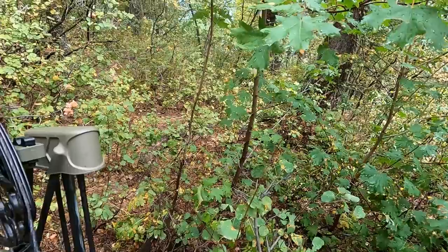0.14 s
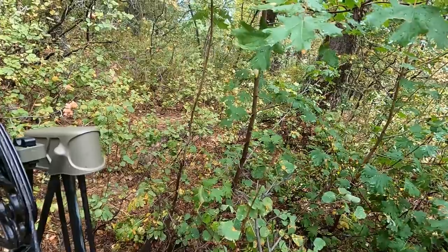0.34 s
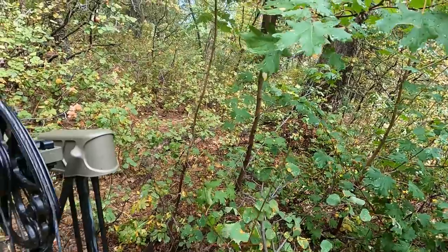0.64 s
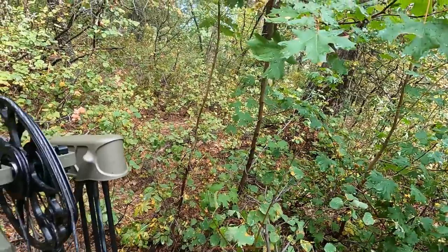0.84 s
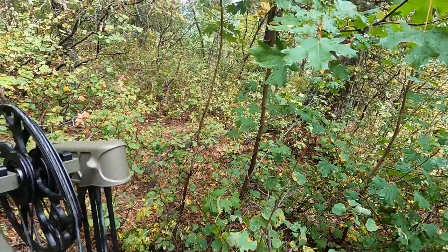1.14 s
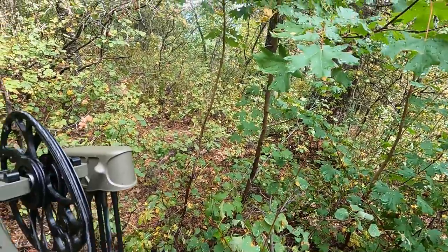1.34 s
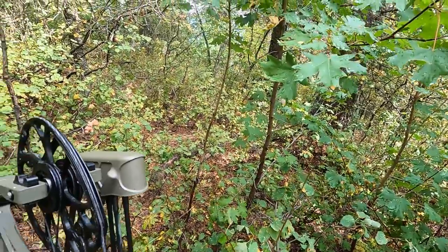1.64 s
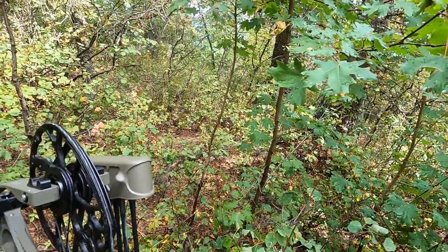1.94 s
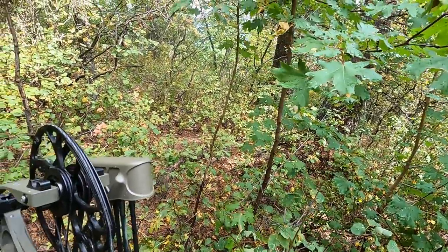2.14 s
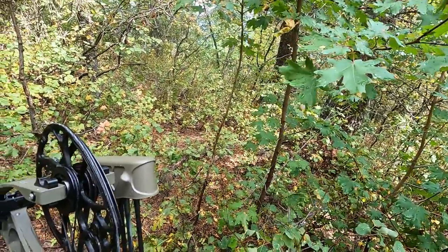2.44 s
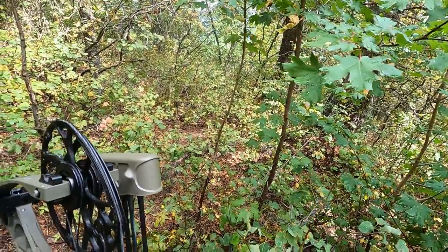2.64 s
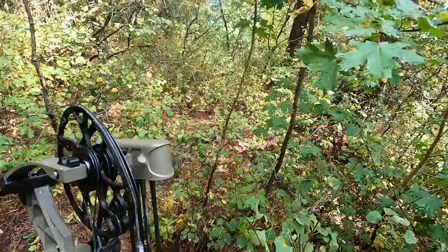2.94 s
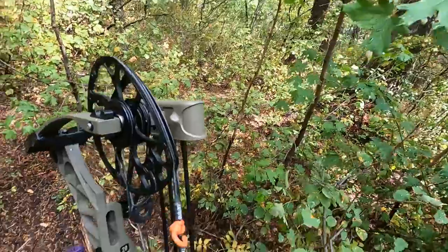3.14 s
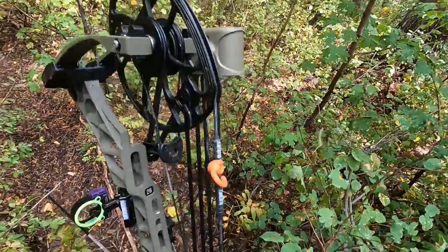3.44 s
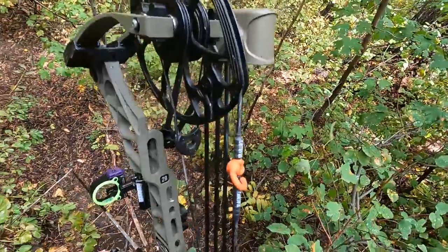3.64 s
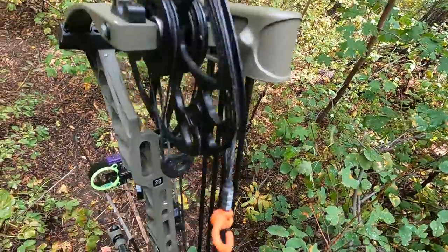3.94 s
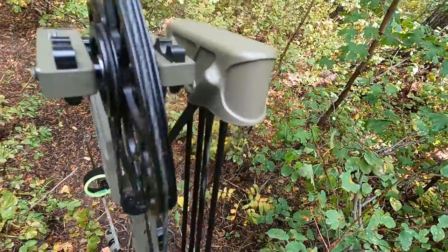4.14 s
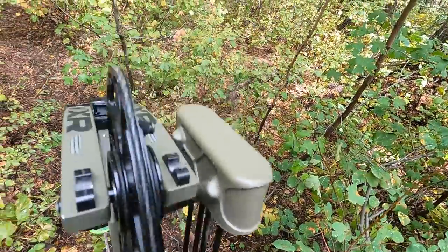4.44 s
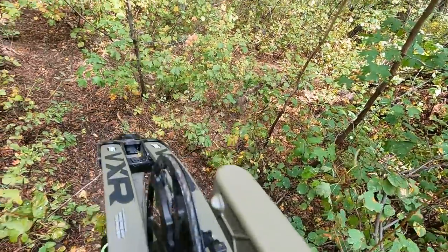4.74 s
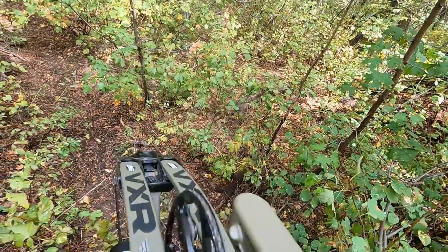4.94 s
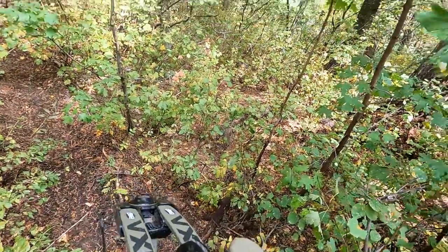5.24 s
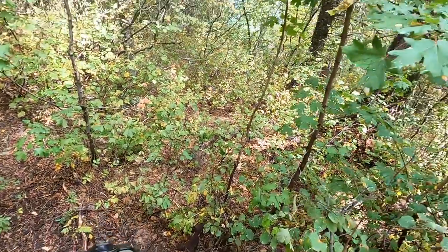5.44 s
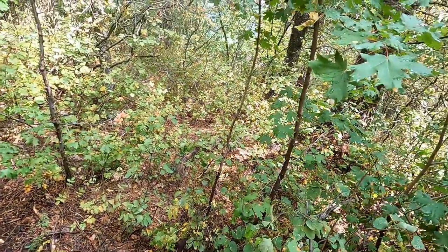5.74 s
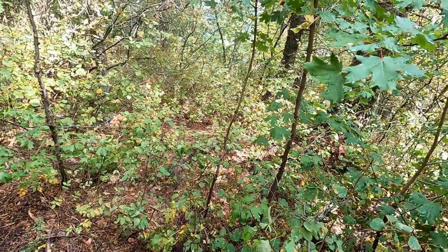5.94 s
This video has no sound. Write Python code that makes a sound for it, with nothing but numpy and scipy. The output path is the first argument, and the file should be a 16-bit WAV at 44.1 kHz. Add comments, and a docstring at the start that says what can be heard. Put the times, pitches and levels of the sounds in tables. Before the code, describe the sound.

In a quiet wood a bull elk gives hoarse, echoing grunts off to the left, while cloth scrapes and thumps close to the microphone.

```python
"""A quiet wood, heard in stereo from a camera: lumpy low rumble, wind on the microphone ports, soft leaf hiss.
A bull elk off to the left is already in the first of three hoarse grunts: flapping folds swell a cry and
puff air through the throat, and sparse taps off the trees carry it on. Within the first second cloth drags
close over the housing (shaped noise) and ends in knocks (ringing modes and a slow bounce). Twigs tick, leaves
rustle in grainy noise and faint fuzzy lines whistle or scrape; two more grunts follow after three seconds."""
import sys
import numpy as np
from scipy import signal
from scipy.fft import rfft, irfft
from scipy.io import wavfile
from scipy.ndimage import uniform_filter1d

SR = 44100
rng = np.random.default_rng(int(sys.argv[2]) if len(sys.argv) > 2 else 0)


def dump(signal):
    """Clip the signal to [-1, 1] and save it as 16-bit WAV at the path in sys.argv[1]."""
    limited = np.clip(np.atleast_2d(signal).T, -1, 1)
    pcm = np.round(limited * 32767).astype(np.int16)
    wavfile.write(sys.argv[1], SR, pcm)


N = 269010  # samples

# Spectra are joined on a log axis; shape_db columns are dB per Hz, side_db columns are left minus right.
# rumble of the place: start_s, level_db; and its spectrum: freq_hz, shape_db
RUMBLE_LEVEL = [(0, -46.5), (.4, -44.5), (.85, -51.5), (1.3, -49.5), (1.65, -48.5), (2.4, -42),
                (2.95, -45.5), (3.3, -43), (3.85, -46), (4.85, -47.5), (5.3, -44.5), (6.1, -49)]
RUMBLE_SHAPE = [(62, -64), (105, -40), (113, -47.5), (133, -14.5), (162, 10.5), (189, 1.5), (231, -8.5),
                (285, -6.5), (354, -19), (500, -33.5), (650, -35.5), (1100, -120)]
# wind on the microphone ports: start_s, level_db; freq_hz, shape_db
WIND_LEVEL = [(0.9, -73), (1.28, -63.5), (1.68, -71.5), (3.12, -66.5), (4.88, -75.5), (5.58, -66),
              (5.75, -71), (6.1, -68)]
WIND_SHAPE = [(10, -23.5), (30, 13.5), (60, 4), (100, 6), (140, -48.5)]
# far leaf hiss: start_s, swell_db (weighted by AIR_SWELL about -60 dB); freq_hz, shape_db
AIR_LEVEL = [(1.3, -67.5), (1.6, -72.5), (1.95, -65.5), (2.35, -66.5), (2.8, -69.5), (3.2, -68)]
AIR_SHAPE = [(210, -28), (350, -1.5), (408, -5.5), (507, -9.5), (649, -11.5), (793, -13), (1020, -5),
             (1360, -4), (1490, -5), (2030, -16.5), (2860, -24.5), (5460, -20.5), (8280, -30.5),
             (11800, -40.5), (14000, -57.5)]
AIR_SWELL = [(600, 0.27), (1300, 1.0), (2500, 0.38)]  # freq_hz, share of the swell that is heard
# stereo field: freq_hz, likeness of the ears (0-1); freq_hz, side_db;
# freq_hz, phase_rad by which the left ear leads the right
SAME = [(60, 0.92), (130, 0.44), (290, 1), (640, 0.44), (1410, 0.51), (3100, 0.2), (6810, 1), (15000, 0.16)]
LEAN = [(60, -0.5), (180, -2.5), (550, -3.5), (1650, -0.5), (4970, 1), (15000, 3)]
LEAD = [(0, 0.76), (2760, 0.58), (4220, -1.6), (5510, 0.58), (12700, 1), (15200, -0.3)]
# the drag jolts the microphone ports
JOLT_S, JOLT_RISE_DB_PER_S, JOLT_FALL_DB_PER_S = 0.502, 296, 148
JOLT_WIND_DB, JOLT_RUMBLE_DB = -28.5, -29.5

# one row a grunt: first_flap_s, length_s, effort_db, top_pitch_hz, settled_flaps_per_s, settle_s,
# fullest_breath_db (against effort), opening_pitch_hz, held_until_s, closing_pitch_hz, upper_throat_db, rasp_hz
GRUNTS = [(-.0735, 0.27, -25.5, 1216, 42.3, 0.086, -18.5, 1071, 0.089, 1111, 0.5, 3800),
          (3.285, .275, -26, 1203, 43.5, .12, -4, 1088, 0.17, 1078, 2.5, 4060),
          (4.468, 0.28, -25, 1289, 44.5, .145, -6.5, 964.5, .11, 1091, 0.5, 4280)]
# upper throat and nose: freq_hz (at a cry pitch of 1200 Hz), width_hz, relative_db, lag_flaps
THROAT = [(1040, 90, -16, .6), (1520, 80, -13, .6), (1690, 80, -15, .4), (1900, 80, -21, .3),
          (2050, 100, -25, .3), (2560, 160, -28, .2)]
# breath noise: freq_hz, shape_db
BREATH_SHAPE = [(1290, -35), (2100, -2), (2350, -14), (2560, -3.5), (2950, -2.5), (3230, -9), (3600, -2.5),
                (4050, -4.5), (4600, -5), (5230, -9), (5800, -14), (9000, -41.5), (11700, -72),
                (19800, -120)]
# elk heard from the left: freq_hz, side_db
ELK_SIDE = [(300, 1), (600, 7), (900, 11), (1250, 16), (1700, 9), (2400, 5), (4400, 6), (9000, 3)]
# decay of the wood's echo: freq_hz, t60_s; and its colour: freq_hz, level_db
WOODS_T60 = [(500, .7), (950, 1.), (1230, 1.75), (1550, 1.4), (1900, 1.05), (2400, .8), (4000, .65),
             (8000, .4)]
WOODS_COLOUR = [(600, 0), (1000, -2), (1230, -1), (1500, -3.5), (2000, -3), (4000, 1)]
TRUNKS_T60 = [(500, 0.3), (5000, 0.15)]  # near trunks: freq_hz, t60_s
TRUNKS_DB, WOODS_DB = -14, -19.5
CLUMP_S = .012  # trunks stand in clumps, so the echo flutters
FIRST_FLAPS_PER_S, SETTLE_BEND = 80, 1.6
SWELL_RISE, SWELL_HOLD, SWELL_FALL = .34, .44, .36  # shares of one flap
# the attack takes a share of the settling time
ATTACK_SHARE, ATTACK_DB, SAG_DB, RELEASE_S, RELEASE_DB, FADE_S = 0.62, -24.5, -2.5, 0.093, -13.5, 0.068
TOP_S, CLOSE_S = .1, 0.19  # the cry pitch reaches its top, and has sunk to its close
LOWEST_HZ, LOWEST_FOLLOWS = 557, 1.53  # lowest throat resonance at a 1200 Hz cry; how steeply it follows the pitch
RASP_WIDTH_HZ, RASP_DB = 1200, -9  # the breath rings in one wide high pocket of the throat
HISS_DB, HISS_FROM_S, HISS_DB_PER_S = -24, 0.076, 107  # breath against effort
BREATH_DIES_S, BREATH_GONE_S = 0.049, 0.012  # before the end
SLAP_FIRST, SLAP_LATER, SLAP_S = .9, .1, .08  # share of bare fold slaps
ROUGH_HELD, ROUGH_FROM_S, ROUGH_END, ROUGH_BEFORE_END_S = .15, .16, .95, .05
PUFF_HELD = .65  # share of air in what rings the throat while the cry is held

# twig and leaf ticks: start_s, peak_db, centre_hz, side_db, woody_body_db (against the peak)
TICKS = [(0.145, -40, 5600, 3, -7.5), (0.337, -56, 4000, 2, 8), (0.356, -55, 6000, -11, 6),
         (0.6047, -47, 7560, 5, 11), (0.84, -59, 3974, -14, -8.5), (2.5239, -63, 4930, 3, 23),
         (2.5391, -46.5, 4360, -3.5, 15), (2.5487, -54.5, 5000, 3, 20.5), (2.57, -45.5, 4000, -4, 9),
         (2.584, -59, 5300, 3, 18), (3.5297, -56, 4370, 5, 12), (3.827, -52.5, 4530, 5, -7),
         (4.3396, -47, 4470, 2, -28), (4.433, -52.5, 4700, 3, -9), (4.562, -48.5, 6100, 7, 5),
         (4.781, -62.5, 7700, 31, -22), (4.8922, -44, 7360, 6, -10), (5.0927, -44, 1980, -4, -10),
         (5.5456, -50, 5000, -1.7, -22)]
TICK_WIDTH = 0.47  # against the centre
# faint fuzzy lines: start_s, end_s, start_hz, end_hz, width_hz, level_db (before the fades)
WHISTLES = [(.15, .36, 7750, 7600, 260, -74), (.6, .93, 4800, 4800, 3, -81),
            (1.1, 1.85, 5320, 5320, 3, -82), (2.37, 2.46, 7500, 7600, 250, -78),
            (3.578, 3.783, 7800, 7600, 250, -78), (4.925, 5.065, 7400, 7800, 300, -73),
            (5.104, 5.142, 2380, 2400, 550, -58), (5.15, 5.177, 1810, 1780, 200, -60),
            (5.11, 5.185, 9140, 9600, 400, -77), (5.193, 5.252, 2630, 2390, 260, -57),
            (5.187, 5.24, 4500, 4500, 500, -63.5), (5.32, 5.435, 2560, 2460, 220, -67),
            (5.658, 5.74, 5840, 5800, 2300, -64)]
# knocks on the housing: start_s, rap_db, bounce_db, side_db
KNOCKS = [(0.219, -65, -38, 2), (0.358, -61, -29.5, -7), (0.481, -30, -8, -4), (.497, -16, -9.5, -5),
          (0.512, -30, -22, -8), (0.569, -35, -22, -5), (.592, -15, -0.5, -7.5)]
# ringing modes of the housing: freq_hz, relative_db, t60_s
HOUSING = [(174, 10, 0.03), (254, 8.5, 0.027), (525, 1.5, 0.022), (925, 4.5, 0.0099), (1380, -6, 0.013)]
BOUNCE_HZ, BOUNCE_T60_S = 31.5, 0.11  # the camera rocking on its mount, once its pitch has sunk
# leaf stirs: peak_s, peak_db, rise_s, fall_s; spectrum of the leaves: freq_hz, shape_db
RUSTLE = [(.272, -64, 0.0078, .04), (2.546, -67.5, 0.047, 0.056), (5.01, -71.5, 0.06, 0.12),
          (5.14, -62, 0.03, 0.11), (5.215, -63.5, 0.031, 0.031), (5.37, -72, 0.15, 0.11),
          (5.562, -68, 0.064, 0.052), (5.696, -71, 0.088, 0.07), (5.85, -75.5, 0.087, 0.11)]
LEAVES_SHAPE = [(880, -46), (1500, -4), (2530, -0.5), (3180, -7), (3360, -10), (3990, -9), (5610, -3),
                (7750, -9.5), (11900, -16.5), (14500, -38)]
SMALL_TICKS_PER_S, SMALL_TICK_DB = 140, 0.5  # crisp grains within the rustle, against its hiss
# cloth drag: start_s, hiss_db (before the changes of tone), handling_rumble_db
DRAG = [(0.33, -45, -54), (0.386, -42.5, -40.5), (0.43, -40.5, -41.5), (0.47, -38.5, -31.5),
        (.52, -37.5, -37), (0.58, -29, -51), (0.6, -25, -11)]
# cloth still slack, then pulled tight at the end of the drag: freq_hz, shape_db
SLACK_CLOTH = [(290, -15), (500, -6), (769, -46), (996, 5), (1090, -3.5), (1490, 3), (1870, -6.5),
               (3140, -4.5), (5650, -3), (6720, -7.5), (7430, -3.5), (8950, -18.5), (13600, -26),
               (14600, -46), (15400, -84)]
TIGHT_CLOTH = [(290, -28), (500, -0.5), (647, -26), (1020, -5.5), (1330, -23), (1470, 2), (1580, -5),
               (1850, -7), (1980, -8), (2420, -11), (2680, -15), (3500, -4.5), (4180, -1.5), (4750, -7),
               (5570, -19.5), (7220, -5), (10500, -22.5), (11900, -18.5), (15400, -37)]
# place of the cloth across the microphones: freq_hz, side_db
CLOTH_SIDE = [(60, -5), (110, -2), (200, -14), (380, -25), (700, -7), (1290, -1), (2380, 0.5), (4400, -3.5),
              (8120, 11), (15000, 4)]
# handling rumble: freq_hz, shape_db; freq_hz, side_db
SHAKE_SHAPE = [(15, -24), (40, -27.0), (120, 8.5), (300, -4.0), (700, -30), (4000, -63), (12000, -110)]
SHAKE_SIDE = [(30, -6), (300, -4)]
DRAG_STOP_S = .592
TIGHT_FROM_S, TIGHT_S, TIGHT_DB = 0.496, 0.543, -1
EDGE_HZ = 15600  # upper band limit


def amp(db):
    """Amplitude factor for a level in dB."""
    return 10 ** (np.asarray(db) / 20)


def evened(x):
    """Scales a signal to rms 1."""
    return x / np.sqrt(np.mean(abs(x) ** 2) + 1e-20)


def read(points, hz):
    """A spectrum table, joined on a log axis."""
    f, value = np.transpose(points)
    return np.interp(np.log(hz + 1), np.log(f + 1), value)


def curve(rows, t):
    """All columns of a curve table at times t."""
    s, *columns = np.transpose(rows)
    return [np.interp(t, s, c) for c in columns]


def ramp(t, start, end):
    """Climbs straight from 0 to 1 between two times."""
    return np.clip((t - start) / (end - start), 0, 1)


def add(mix, s, sound):
    """Lays a sound into the mix from s seconds on."""
    part = mix[..., round(s * SR):][..., :sound.shape[-1]]
    part += sound[..., :part.shape[-1]]


def pan(db):
    """Left and right gains for a level difference."""
    return amp(np.array([db / 2, -db / 2]))


def resonate(x, hz, width):
    """Shifts the curve hz down to zero, smooths twice, shifts back: a steep resonance."""
    turn = np.exp(2j * np.pi * np.cumsum(hz * np.ones(len(x))) / SR)
    r = np.exp(-np.pi * width / SR)
    smooth = signal.lfilter([(1 - r) ** 2], [1, -2 * r, r * r], x / turn + 1e-18)
    return 2 * (turn * smooth).real


def noise(level_db, same, lean, size, patchy_db, band=(0, SR), lead=((0, 0), (1, 0))):
    """Stereo noise; level_db(hz, t) gives shape and swell, and a steady shape has rms 1 in the band."""
    hz = np.fft.rfftfreq(size, 1 / SR)[:, None]
    t = np.arange(4 * N // size + 5) * size / 4 / SR
    a, b, c, d, patches = rng.standard_normal((len(t), len(hz), 5)).T
    patches = uniform_filter1d(patches, size=size // 64, axis=0)
    patches = evened(uniform_filter1d(patches, size=12000 // size, axis=1))
    same, left = np.clip(same, 0, 1), a + 1j * b
    right = same * left + np.sqrt(1 - same ** 2) * (c + 1j * d)
    z = np.array([left * np.exp(1j * read(lead, hz)), right])
    shape_db, swell_db = level_db(hz, t)
    inside = (hz >= band[0]) & (hz < band[1])
    gain = amp(shape_db + swell_db + patchy_db * patches) / np.linalg.norm(amp(shape_db)[inside])
    z *= pan(read(lean, hz)) * gain
    return signal.istft(z, nperseg=size, noverlap=3 * size // 4)[1][:, :N]


def background():
    """Three shaped noises: patchy low rumble, deep wind on the microphone ports, hiss of far leaves."""
    def jolt_db(s):
        return np.minimum(JOLT_RISE_DB_PER_S * (s - JOLT_S), JOLT_FALL_DB_PER_S * (JOLT_S - s))

    def rumble_db(hz, s):
        return read(RUMBLE_SHAPE, hz), np.maximum(curve(RUMBLE_LEVEL, s)[0], JOLT_RUMBLE_DB + jolt_db(s))

    def wind_db(hz, s):
        return read(WIND_SHAPE, hz), np.maximum(curve(WIND_LEVEL, s)[0], JOLT_WIND_DB + jolt_db(s))

    def air_db(hz, s):
        return read(AIR_SHAPE, hz), (curve(AIR_LEVEL, s)[0] + 60) * read(AIR_SWELL, hz) - 56

    same = read(SAME, np.fft.rfftfreq(1024, 1 / SR)[:, None])
    rumble = noise(rumble_db, 0.64, LEAN, size=2048, patchy_db=2.0, band=(110, 330))
    wind = noise(wind_db, 0.9, LEAN, size=4096, patchy_db=3.5)
    air = noise(air_db, same, LEAN, size=1024, patchy_db=1.8, band=(900, 1900), lead=LEAD)
    return rumble + wind + air


def flap_swell(turns, lag, floor):
    """In each turn of the folds the sound opens, holds and dies above a steady floor."""
    part = (turns - lag + .33) % 1
    rise = lambda x: np.sin(np.pi / 2 * np.clip(x, 0, 1)) ** 2
    return evened(floor + rise(part / SWELL_RISE) * rise(1 - (part - SWELL_HOLD) / SWELL_FALL))


def upper_throat(turns, puffs, stretch, airy, throat_db):
    """Upper throat and nose resonances, rung by puffs of air and by one push a flap."""
    total = 0
    for puff, (f, width, db, lag) in zip(puffs, THROAT):
        push = np.diff(np.floor(turns - lag + .2), prepend=-1).clip(0)
        aired = flap_swell(turns, lag, .7) * evened(resonate(puff, f * stretch, width))
        pushed = evened(resonate(push, f * stretch, width))
        total = total + amp(db + throat_db) * (airy * aired + np.sqrt(1 - airy ** 2) * pushed)
    return total


def throat_breath(turns, air, rasp_hz):
    """Turbulent breath, gusting with the flaps, plus its ringing in a wide high pocket."""
    gust = flap_swell(turns, .8, 1.8)
    shape = amp(read(BREATH_SHAPE, np.fft.rfftfreq(len(air), 1 / SR)))
    breath = evened(gust * irfft(rfft(air) * shape, len(air)))
    return breath + amp(RASP_DB) * gust * evened(resonate(air, rasp_hz, RASP_WIDTH_HZ))


def grunt(length, effort_db, top_hz, settled, settle_s, fullest_db, open_hz, held_s, close_hz, throat_db, rasp_hz):
    """A cry near 1.2 kHz swells once in each slow fold flap; puffs of air ring the throat in between."""
    t = np.arange(0, length, 1 / SR)
    attack_s = ATTACK_SHARE * settle_s
    level_db = (effort_db + ATTACK_DB * (1 - ramp(t, 0, attack_s)) ** 2.28
                + SAG_DB * ramp(t, attack_s, length - RELEASE_S) ** 2
                + RELEASE_DB * ramp(t, length - RELEASE_S, length))
    rate = settled + (FIRST_FLAPS_PER_S - settled) * (1 - ramp(t, 0, settle_s)) ** SETTLE_BEND
    turns = np.cumsum(rate) / SR
    hz = (top_hz - (top_hz - open_hz) * (1 - ramp(t, 0, TOP_S)) ** 2
          - (top_hz - close_hz) * ramp(t, held_s, CLOSE_S) ** 1.373)
    low_hz = LOWEST_HZ * (hz / 1200) ** LOWEST_FOLLOWS
    hiss_db = np.minimum(HISS_DB + HISS_DB_PER_S * np.maximum(t - HISS_FROM_S, 0), fullest_db)
    slap = SLAP_LATER + (SLAP_FIRST - SLAP_LATER) * np.cos(np.pi / 2 * ramp(t, 0, SLAP_S)) ** 2
    roughening = np.sin(np.pi / 2 * ramp(t, ROUGH_FROM_S, length - ROUGH_BEFORE_END_S))
    rough = ROUGH_HELD + (ROUGH_END - ROUGH_HELD) * roughening
    wander_air, rasp_air, low_air, breath_air, *puffs = rng.standard_normal((len(THROAT) + 4, SR))[:, :len(t)]

    sag = 1 - .022 * np.sin(2 * np.pi * (turns - .2))  # the pitch slides down through each swell
    wander = 1 + .011 * evened(uniform_filter1d(wander_air, size=300))
    cry = flap_swell(turns, .2, .26) * np.sqrt(2) * np.sin(2 * np.pi * np.cumsum(hz * sag * wander) / SR)
    rasp = evened(resonate(rasp_air, 1.163 * hz, 320))
    stretch = (hz / 1200) ** .4  # the throat follows the pitch only in part
    airy = PUFF_HELD + (1 - PUFF_HELD) * rough
    upper = upper_throat(turns, puffs, stretch, airy, throat_db)

    slaps = np.diff(np.floor(turns), prepend=-1)
    slaps = uniform_filter1d(uniform_filter1d(slaps, size=4), size=3)  # soft-edged
    lowest = evened(resonate(slaps, low_hz, 110)) + evened(resonate(low_air, low_hz, 120))
    lowest = amp(-20.5) * evened(lowest)
    snap = resonate(slaps, 1.106 * hz, 230) + 0.66 * resonate(slaps, 1480, 170)
    snap = evened(snap + 0.02 * resonate(slaps, 3700, 1400))

    breath_fade = 1 - ramp(t, length - BREATH_DIES_S, length - BREATH_GONE_S)
    breath = amp(hiss_db) * throat_breath(turns, breath_air, rasp_hz) * breath_fade
    held = np.sqrt(1 - rough ** 2) * cry + 0.68 * rough * rasp + (0.73 + 1.44 * rough) * upper + lowest
    voice = (1 - slap) * held + 0.98 * slap * snap
    return amp(level_db) * (1 - ramp(t, length - FADE_S, length)) * (voice + breath)


def scatter(start, t60_table, clump_db):
    """Sparse taps of random sign, each band dying at its own speed, other taps for each ear."""
    taps = np.zeros((2, 2 * SR))
    slots = np.arange(round(start * SR), 2 * SR - 20, 20)  # one tap in every 20 samples
    at = slots + rng.integers(0, 20, (2, len(slots)))
    np.put_along_axis(taps, at, rng.choice([-1., 1.], (2, len(slots))), 1)
    clump = round(CLUMP_S * SR)
    taps *= amp(clump_db * rng.standard_normal(2 * SR // clump + 1).repeat(clump)[:2 * SR])
    hz, t, z = signal.stft(taps, SR, nperseg=512)
    tail = signal.istft(z * amp(-60 * t / read(t60_table, hz)[:, None]), SR, nperseg=512)[1]
    return tail / np.linalg.norm(tail[0])


def elk():
    """Grunts from the left, shadowed on the right, smeared by near trunks and carried on by the wood."""
    call = np.zeros(SR + N)  # begins one second early: the first grunt is already under way
    for start, *row in GRUNTS:
        add(call, 1 + start, grunt(*row))
    hz = np.fft.rfftfreq(len(call), 1 / SR)
    side_db = read(ELK_SIDE, hz)
    direct = irfft(rfft(call) * amp(np.array([0 * side_db, -side_db])), len(call))
    far = irfft(rfft(call) * amp(read(WOODS_COLOUR, hz)), len(call))
    near_taps = scatter(0.004144, TRUNKS_T60, clump_db=-2.5)
    far_taps = scatter(.03, WOODS_T60, clump_db=4.)
    trunks = signal.fftconvolve(call[None], near_taps, axes=1)[:, :len(call)]
    woods = signal.fftconvolve(far[None], far_taps, axes=1)[:, :len(call)]
    return (direct + amp(TRUNKS_DB) * trunks + amp(WOODS_DB) * woods)[:, SR:]


def ticks():
    """Twigs and leaves: each a bright burst of a few milliseconds over a duller woody body."""
    out, t = np.zeros((2, N)), np.arange(800) / SR
    for s, db, hz, side_db, body_db in TICKS:
        burst = rng.standard_normal(len(t))
        snap = resonate(burst * amp(-60 * t / .011) * (1 - np.exp(-t / .0003)), hz, TICK_WIDTH * hz)
        body = resonate(burst * amp(-60 * t / 0.046), 310, 1700)
        both = snap / abs(snap).max() + amp(body_db) * body / abs(body).max()
        add(out, s, amp(db) * both * pan(side_db)[:, None])
    return out


def whistles():
    """Noise through gliding resonances: thin faint whistles high up and small scrapes."""
    out = np.zeros((2, N))
    for s, end, start_hz, end_hz, width, db in WHISTLES:
        size = round((end - s) * SR)
        line = evened(resonate(rng.standard_normal(size), np.linspace(start_hz, end_hz, size), width))
        add(out, s, amp(db) * line * signal.windows.tukey(size, .6) * pan(1.5)[:, None])
    return out


def knocks():
    """A short rap rings the housing's modes, then comes a slow bounce whose pitch sinks."""
    out, t = np.zeros((2, N)), np.arange(SR // 3) / SR
    rap = sum(amp(db - 60 * t / t60) * np.sin(2 * np.pi * hz * t) for hz, db, t60 in HOUSING)
    rap = rap * (1 - np.exp(-t / 0.0029))
    late = np.maximum(t - .007, 0)
    turns = BOUNCE_HZ * (late + 0.013 * (1 - np.exp(-late / 0.0054)))
    swing = np.sin(2 * np.pi * turns) * amp(-60 * late / BOUNCE_T60_S) * (1 - np.exp(-(late / .004) ** 2))
    bounce = np.array([swing * (1 - np.exp(-(late / .009) ** 4)), swing])  # it reaches the left port late
    for s, rap_db, bounce_db, side_db in KNOCKS:
        add(out, s, (amp(rap_db) * rap + amp(bounce_db) * bounce) * pan(side_db)[:, None])
    return out


def rustle():
    """Grainy leaf noise that swells and dies with each stir."""
    t = np.arange(N) / SR
    power = sum(amp(2 * db) * np.exp(-2 * ((t - s) / np.where(t < s, rise, fall)) ** 2)
                for s, db, rise, fall in RUSTLE)
    grain = amp(0.62 * np.minimum(rng.exponential(1, N // 64 + 1), 5)).repeat(64)[:N]
    grain = evened(uniform_filter1d(grain, size=64))
    small_ticks = rng.random(N) < SMALL_TICKS_PER_S / SR
    crisp = signal.lfilter([1], [1, -np.exp(-1 / (.0015 * SR))], small_ticks)  # each dies in 1.5 ms
    grain = evened(grain + amp(SMALL_TICK_DB) * crisp)
    leaves_db = lambda hz, s: (read(LEAVES_SHAPE, hz), 0 * s)
    hiss = noise(leaves_db, 0.66, LEAN, size=256, patchy_db=-0.5, band=(6500, 13000))
    return np.sqrt(power) * grain * hiss


def drag():
    """Cloth hiss that brightens as it speeds up, and the shaking that it sends through the housing."""
    t = np.arange(N) / SR
    hiss_db, shake_db = curve(DRAG, t)
    on = ramp(t, DRAG[0][0], DRAG[0][0] + 0.061) * np.clip((DRAG_STOP_S - t) / 0.012, 0, 1)

    def cloth_db(hz, s):
        slack_db = read(SLACK_CLOTH, hz)
        slowness_db = np.minimum(curve(DRAG, s)[0] + 39, 0)  # a slow drag loses treble
        octaves = 0.98 * np.log2(np.maximum(hz, 1500) / 1500) + 0.78 * np.log2(np.maximum(hz, 7500) / 7500)
        tightening = ramp(s, TIGHT_FROM_S, TIGHT_S) * (read(TIGHT_CLOTH, hz) - slack_db + TIGHT_DB)
        return slack_db, slowness_db * octaves + tightening

    hiss = noise(cloth_db, .4, CLOTH_SIDE, size=256, patchy_db=2.5, band=(2000, 9000))
    low_db = lambda hz, s: (read(SHAKE_SHAPE, hz), 0 * s)
    shake = noise(low_db, .9, SHAKE_SIDE, size=2048, patchy_db=2.)
    return on * (amp(hiss_db) * hiss + amp(shake_db) * shake)


def scene():
    """The wood, the elk in it, and the small sounds close to the microphones."""
    return background() + elk() + ticks() + whistles() + knocks() + rustle() + drag()


def record(dry):
    """The band limit: a steep linear-phase low-pass."""
    low_pass = signal.firwin(511, EDGE_HZ, window=("kaiser", 9), fs=SR)
    return signal.oaconvolve(dry, low_pass[None], "same")


dry = scene()
out = record(dry)
dump(out)
```